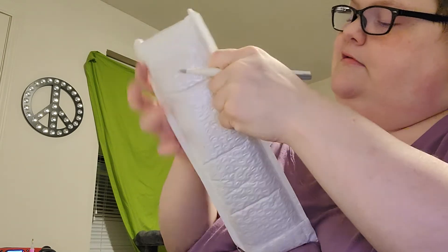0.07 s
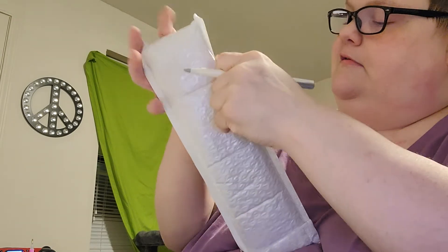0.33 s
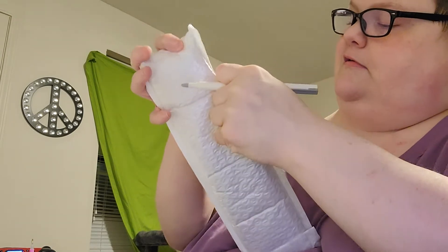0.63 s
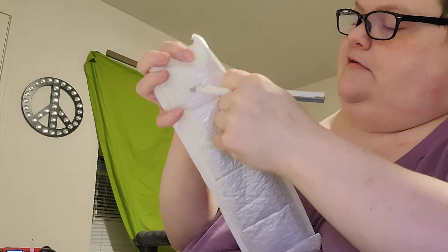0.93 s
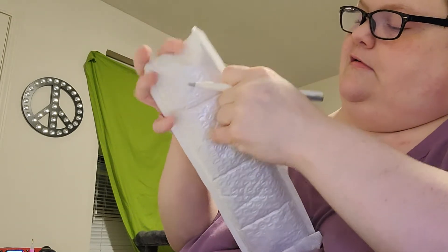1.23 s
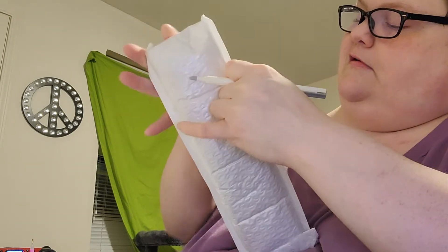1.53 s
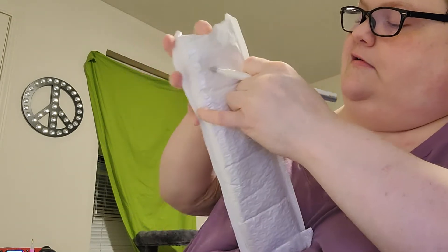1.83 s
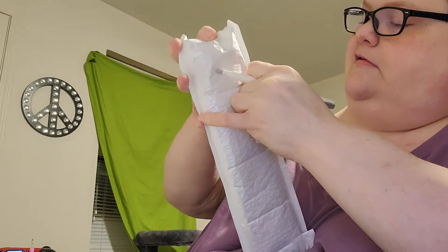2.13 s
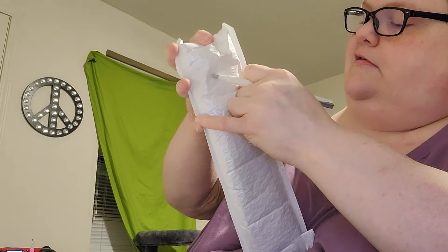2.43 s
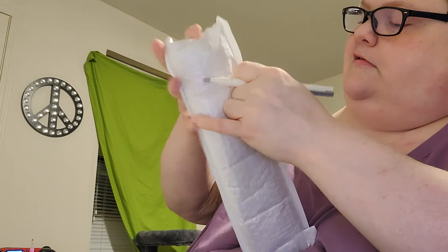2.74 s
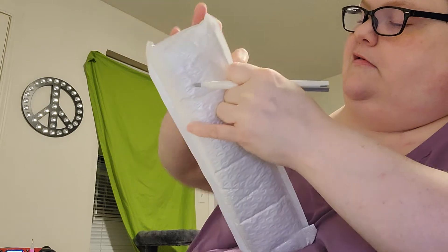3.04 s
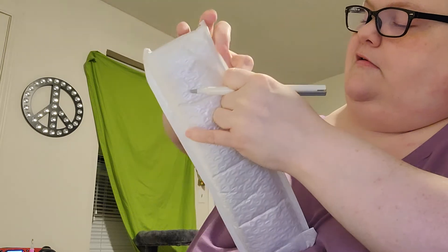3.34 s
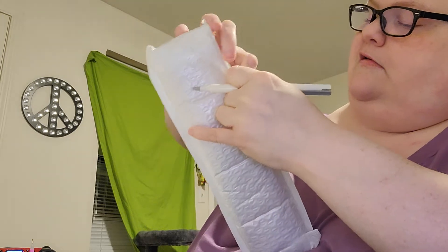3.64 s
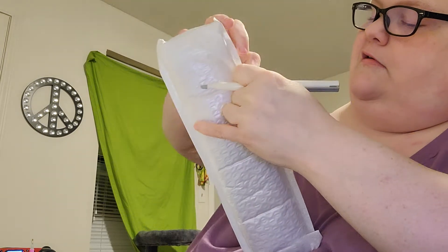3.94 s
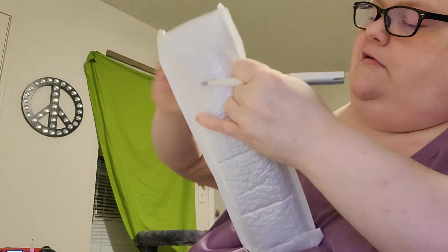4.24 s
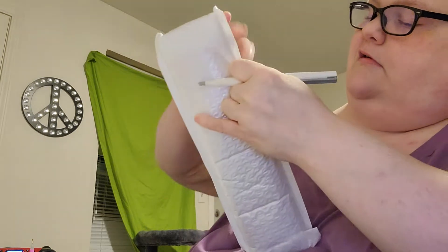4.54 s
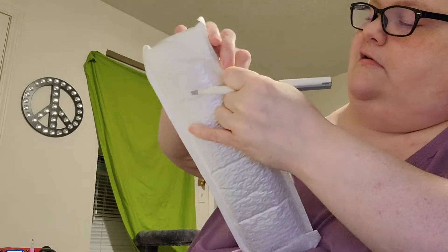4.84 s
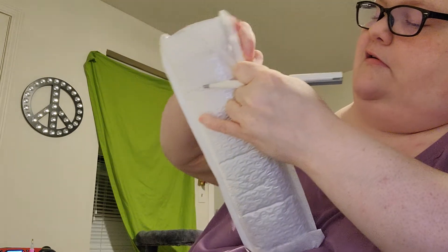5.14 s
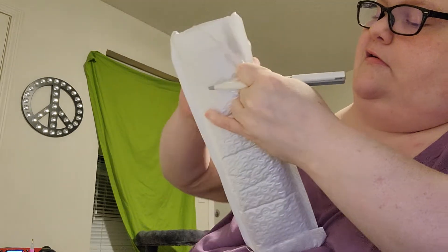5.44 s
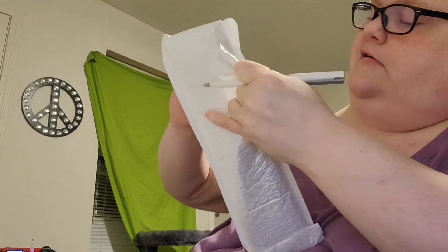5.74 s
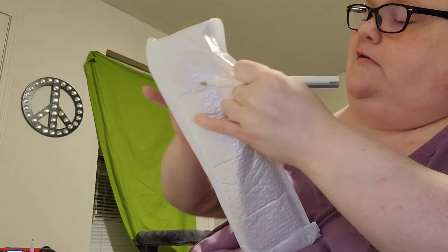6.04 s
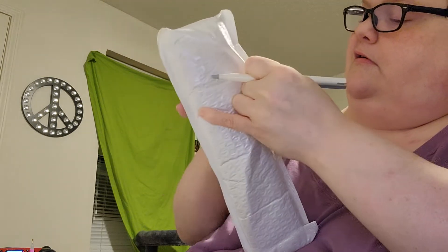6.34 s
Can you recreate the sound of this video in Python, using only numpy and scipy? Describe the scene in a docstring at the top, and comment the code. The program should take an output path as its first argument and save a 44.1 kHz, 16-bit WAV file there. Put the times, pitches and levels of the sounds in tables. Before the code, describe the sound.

A padded plastic mailer crinkles, snaps and swishes as fingers squeeze it and a pen tip pokes it, close up indoors.

```python
"""Creases snap in a padded plastic mailer, squeezed and poked with a pen tip, close up in a small room.
Each snap buckles a panel, cracks the film and thumps the air-filled pouch; a hard push ends in a burst
of crackle. Finger strokes flip wrinkles, crumple the padding, swish over the film and at times make
the pouch groan. The room answers briefly and rumbles faintly underneath."""
import sys
import numpy as np
from scipy import signal
from scipy.fft import rfft, irfft, next_fast_len
from scipy.io import wavfile
from scipy.ndimage import uniform_filter1d, map_coordinates

SR = 44100
rng = np.random.default_rng(int(sys.argv[2]) if len(sys.argv) > 2 else 0)


def wav_record(signal):
    """Record a signal, one row per channel, as 16-bit PCM in the file named by sys.argv[1]."""
    frames = np.transpose(np.atleast_2d(signal))
    bounded = np.clip(frames, -1, 1)
    # unit amplitude maps onto the largest positive 16-bit level
    quanta = np.round(bounded * 32767).astype(np.int16)
    wavfile.write(sys.argv[1], SR, quanta)


N = 285856

# Crease snaps: (time [s], panel level [dB], panel pitch [Hz], thump level [dB], crack level [dB])
CREASE_SNAPS = [(0.498, -30.5, 1410, -80, -54.5), (0.573, -31.5, 1530, -62, -61),
                (0.616, -30.5, 2230, -61, -54), (0.781, -29, 2360, -63, -54), (0.83, -33, 2000, -80, -55),
                (0.875, -39, 2260, -62, -55), (0.89, -38, 1390, -64, -55), (1.047, -36, 2040, -59, -59),
                (1.089, -29.5, 3550, -57.5, -60), (1.338, -26.5, 2260, -55, -62),
                (1.38, -37.5, 1280, -47.5, -69), (1.512, -31.5, 2300, -59.5, -53.5),
                (1.651, -35, 5800, -58, -49.5), (1.751, -30, 2410, -62, -59.5),
                (1.85, -30.5, 3920, -58.5, -70), (1.884, -42, 1190, -56.5, -50),
                (2.046, -27, 5100, -62, -50.5), (2.095, -31, 2160, -70, -58),
                (2.228, -26.5, 4530, -78, -54), (2.57, -50, 1300, -64.5, -56.5),
                (2.66, -31, 2600, -59, -55), (2.841, -30.5, 5170, -71, -48.5),
                (2.943, -33, 2330, -63, -48.5), (3.137, -33, 2220, -59, -60), (3.156, -33, 1490, -50, -61),
                (3.429, -51, 1400, -70, -56), (3.868, -26.5, 7250, -75, -59),
                (4.111, -46.5, 1310, -66, -66.5), (4.2643, -22.5, 1310, -46.5, -35.5),
                (4.267, -23, 2270, -42.5, -48.5), (5.295, -17.5, 1250, -42, -42.5),
                (5.304, -42, 950, -60, -49), (5.5705, -21.5, 1750, -52.5, -41.5),
                (5.593, -27, 2220, -60, -45), (5.6, -24, 1360, -66, -44), (5.621, -25, 2350, -43, -47),
                (5.6652, -2.5, 2520, -46, -35), (5.678, -23.5, 2750, -46, -47), (5.69, -17, 1370, -57, -60),
                (5.6985, -17.5, 2160, -48.5, -64), (6.229, -30, 1500, -57, -56),
                (6.28, -20.5, 2930, -63, -56.5)]
# Pouch thump spectrum: (frequency [Hz], gain [dB])
THUMP_SPECTRUM = [(60, -3), (150, -22), (220, 1.5), (290, -8), (370, 3), (520, 2), (700, 0), (1200, -8.5),
                  (2000, -3.5), (5000, -82)]
# Film crack spectrum: (frequency [Hz], gain [dB])
CRACK_SPECTRUM = [(500, -7), (2000, 13), (7200, 11), (9800, -3), (13500, -6), (16000, -6)]

def snaps(panel_gain_db=-3.5, thump_gain_db=-8, crack_gain_db=-6, creak_t60_s=0.0115, load_s=0.0016):
    """Each crease creaks under load, buckles, cracks, shivers, sets off folds and thumps the pouch."""
    out, t = np.zeros((2, N)), np.arange(-800, 3296) / SR
    for time_s, panel_db, hz, thump_db, crack_db in CREASE_SNAPS:
        cycles = 0.55 * (hz / 2500) ** 0.44  # taut, high panels ring for more cycles
        panel = amp(panel_db + panel_gain_db) * buckle(t, hz, cycles)
        settling = amp(0.62 * panel_db) * (amp(-21) * flutter(t, hz) + amp(-26) * aftershocks(t, hz))
        thump_envelope = swell(t, creak_t60_s, fall_t60_s=0.033)
        crack_envelope = swell(t - 0.00015, creak_t60_s, fall_t60_s=0.011)
        thump = amp(thump_db + thump_gain_db) * burst(THUMP_SPECTRUM, thump_envelope)
        crack = amp(crack_db + crack_gain_db) * burst(CRACK_SPECTRUM, crack_envelope)
        add(out, time_s + load_s + t[0], panel + settling + thump + crack)
    return out

def buckle(t, hz, cycles):
    """A panel flips over: a smooth packet of a few cycles, peak 1."""
    turns = np.maximum(t, 0) * hz
    wave = np.sin(2 * np.pi * turns) * turns ** 2 * np.exp(-turns / cycles)
    return wave / np.abs(wave).max()

def flutter(t, hz, cycles=0.56, t60_s=0.034):
    """The creased panel shivers raggedly at its own pitch; peak 1."""
    shiver = spread(rng.standard_normal((2, len(t))) ** 3) * (t >= 0) * amp(-60 * np.abs(t) / t60_s)
    ring = signal.fftconvolve(shiver, buckle(t[t >= 0], hz, cycles)[None], axes=1)[:, :len(t)]
    return ring / np.abs(ring).max()

def aftershocks(t, hz, pull_hz=2700, lag_s=0.008, t60_s=0.079, count=9):
    """Smaller folds give way just before and after a snap, each with its own pitch and side."""
    out = np.zeros((2, len(t)))
    waits_s = rng.exponential(lag_s, count) - lag_s / 2
    for wait_s, (pitch, pan) in zip(waits_s, scatter((count, 2))):
        fold_hz = np.sqrt(hz * pull_hz) * np.exp(0.35 * pitch)
        gain_db = -60 * abs(wait_s) / t60_s + 2 * pan * np.array([[1], [-1]])
        out += amp(gain_db) * buckle(t - wait_s, fold_hz, cycles=0.27)
    return out

# Dry wrinkle ticks: (time [s], level [dB], pitch [Hz])
WRINKLE_TICKS = [(0.03, -35, 2340), (0.197, -35, 4770), (0.464, -31.5, 4250), (0.481, -35, 2280),
                 (0.691, -40, 4770), (0.884, -30.5, 6850), (0.931, -39.5, 2280), (1.003, -49, 1350),
                 (1.154, -36.5, 2730), (1.204, -35, 3270), (1.259, -35, 8450), (1.308, -35, 3200),
                 (1.607, -39, 6200), (2.112, -32.5, 2130), (2.413, -45.5, 1590), (2.518, -39.5, 2390),
                 (2.534, -45, 2280), (2.634, -43.5, 2270), (2.803, -40, 2580), (2.891, -34, 2580),
                 (3.158, -33.5, 4530), (3.195, -43, 1410), (3.208, -34, 5650), (3.396, -45, 2190),
                 (3.454, -47, 2280), (3.497, -46, 4470), (3.539, -42, 2200), (3.575, -36.5, 1770),
                 (3.654, -42, 4400), (3.777, -36.5, 3900), (3.904, -39, 4240), (4.054, -42, 2070),
                 (4.07, -43, 7150), (4.964, -37, 2120), (4.99, -38.5, 2140), (5.062, -39, 3750),
                 (5.163, -42.5, 1500), (5.359, -35, 1880), (5.521, -45.5, 1300), (5.612, -24.5, 2240),
                 (5.911, -37, 2900), (5.972, -36, 4130), (6.099, -33, 8700), (6.262, -35, 2150),
                 (6.294, -32.5, 3200), (6.324, -34, 2600), (6.383, -32, 1993)]

def crinkles(gain_db=-3, faint_hz=3300, crack_t60_s=0.026, count=280):
    """Wrinkles flip, shiver and crack; faint random ones come denser and louder as the padding crumples."""
    crumple, _ = effort()
    strain = (crumple / np.median(crumple)) ** 0.38
    starts = np.searchsorted(np.cumsum(strain) / strain.sum(), rng.random(count))
    size, pitch = scatter((count, 2)).T
    faint_db = -48.5 + 20 * np.log10(strain[starts]) + 3.4 * size
    faint = zip(starts / SR, faint_db, faint_hz * np.exp(0.44 * pitch))
    flips, crack_envelope, t = np.zeros((2, N)), np.zeros(N), np.arange(1024) / SR
    for time_s, db, hz in [*WRINKLE_TICKS, *faint]:
        add(flips, time_s, amp(db) * (buckle(t, hz, cycles=0.55) + amp(-6) * flutter(t, hz)))
        add(crack_envelope, time_s, amp(db - 60 * t / crack_t60_s))
    cracks = amp(-12) * crack_envelope * burst(CRACK_SPECTRUM, np.ones(N))
    return amp(gain_db) * (flips + cracks)

# Finger and pen strokes: (start [s], length [s], crumpling level [dB], sliding level [dB])
HAND_STROKES = [(0.0, .035, -59, -56.5), (0.058, .36, -75, -58), (0.428, .07, -67.5, -55.5),
                (0.618, .04, -58.5, -57.5), (0.783, .16, -62, -55.5), (1.037, .17, -65, -66.5),
                (1.31, .12, -60, -52.5), (1.75, .13, -59, -57.5), (1.922, .08, -65, -61),
                (2.235, .02, -65.5, -54), (2.884, .033, -56.5, -54), (2.926, .045, -56.5, -55),
                (3.166, .06, -62, -59), (3.262, 0.012, -72, -55.5), (3.44, .16, -70, -63),
                (3.63, .022, -64, -52.5), (3.863, 0.024, -79.5, -55.5), (4.222, .035, -67.5, -58),
                (4.276, .03, -54.5, -48), (4.341, .027, -50, -44), (4.416, .06, -72, -55.5),
                (4.689, .025, -64, -54), (4.774, .02, -61, -59.5), (4.996, 0.028, -65.5, -55.5),
                (5.168, .11, -65.5, -61), (5.319, .085, -62, -53.5), (5.594, .113, -53, -44),
                (5.984, .115, -60, -55.5), (6.235, .088, -60.5, -60)]
# Light rubbing of the holding hand: (time [s], level [dB])
GRIP_RUB = [(0.3, -67), (1.0, -62), (1.9, -66), (2.45, -76), (3.3, -70), (4.0, -75.5), (4.6, -69),
            (5.8, -73), (6.48, -61)]

def effort(attack_s=0.027, release_t60_s=0.17, creep_db=-14, creep_t60_s=0.92):
    """(Crumpling, sliding) gains: strokes build, hold and let go, then the film creeps back."""
    t = np.arange(N) / SR
    power = amp(curve(GRIP_RUB) + np.array([[-1.5], [0.5]])) ** 2
    for start_s, length_s, crumple_db, slide_db in HAND_STROKES:
        attack = np.clip(1 + (t - start_s) / attack_s, 0, 1) ** 2
        after_s = np.maximum(t - start_s - length_s, 0)
        release = amp(np.maximum(-60 * after_s / release_t60_s, creep_db - 60 * after_s / creep_t60_s))
        power += (amp([[crumple_db], [slide_db]]) * attack * release) ** 2
    return np.sqrt(power)

# Padded sheet resonances: (centre [Hz], width [Hz], gain [dB])
SHEET_MODES = [(354.4, 30, -2), (508, 83, -2.5), (1405, 280, -3), (2090, 640, -1.5)]

def crumpling(folds_per_s=1000, clump_db=3):
    """Tiny folds give way in clumps and ring the padded sheet, whose tone shifts as it bends."""
    crumple, _ = effort()
    ring = np.zeros((2, N))
    for centre_hz, width_hz, db in SHEET_MODES:
        folds = ticks(folds_per_s, scatter_db=3) * amp(clump_db * wobble(39))
        ring += amp(db) * filtered(folds, lambda hz: resonance(hz, centre_hz, width_hz) ** 2)
    return crumple * unit(patchy(spread(flexed(ring)), depth_db=3.5))

def flexed(x, bend=0.09):
    """The sheet flexes: its resonances drift up and down in pitch."""
    position = np.cumsum(np.exp(bend * wobble(10)))
    return np.array([map_coordinates(side, [position], mode="mirror") for side in x])

# Film swish spectrum: (frequency [Hz], gain [dB])
SWISH_SPECTRUM = [(200, -19), (450, 0.5), (900, -8), (2300, -2.5), (3400, 0.5), (4700, -0.5), (7600, -2.5),
                  (9400, -18)]
# Top treble of the swish: (time [s], gain [dB])
SWISH_SHEEN = [(0, 4.5), (0.9, 0), (1.45, 5), (2.3, -3.5), (2.95, 4.5), (3.3, -1.5), (4.7, 4.5), (6.48, 5)]

def sliding(gain_db=0.94, slips_per_s=7000, sheen_hz=8800):
    """Skin and pen tip slip on the film: a fine swish that catches more where the padding crumples."""
    crumple, slide = effort()
    catch_db = 5.2 * crumple / (crumple + slide)
    slips = ticks(slips_per_s, scatter_db=3.5) * amp(wobble(50) + catch_db * wobble(220))
    swish = filtered(spread(slips), lambda hz: colour(SWISH_SPECTRUM, hz))
    swish = unit(patchy(swish, depth_db=2.7))
    top = filtered(swish, lambda hz: hz > sheen_hz)
    return amp(gain_db) * slide * (swish - top + amp(curve(SWISH_SHEEN)) * top)

# Pouch groans: (time [s], level [dB], pitch [Hz])
POUCH_GROANS = [(0.358, -52, 515), (1.105, -51.5, 552), (2.925, -49, 383), (5.625, -47.5, 345)]

def groans(rise_t60_s=0.033, fall_t60_s=0.054, waver_rad=0.18):
    """A dragging fingertip sticks and slips; the hollow pouch sounds one rough note."""
    out, t = np.zeros(N), np.arange(N) / SR
    for time_s, db, hz in POUCH_GROANS:
        note = unit(np.sin(2 * np.pi * hz * t + waver_rad * wobble(150)))
        out += amp(db) * swell(t - time_s, rise_t60_s, fall_t60_s) * note
    return out

# Broad spectral dips: (centre [Hz], width [Hz], depth [0-1])
TONE_DIPS = [(1727, 475, 0.56), (3090, 1360, 0.46)]

def notched(hz):
    """Two broad dips carve the tone of everything the mailer makes."""
    dips = [1 - depth * resonance(hz, centre_hz, width_hz) for centre_hz, width_hz, depth in TONE_DIPS]
    return np.prod(dips, axis=0)

# Stereo tilt: (frequency [Hz], left boost and right cut [dB])
LEFT_TILT = [(2400, -0.57), (5500, 1.4)]

def lean(hz, lead_s=0.00004):
    """The mailer sits slightly left and beams its treble that way."""
    sides = np.array([[1], [-1]])
    return amp(along(LEFT_TILT, hz) * sides) * np.exp(1j * np.pi * hz * lead_s * sides)

def grip_bump(time_s=3.157, level_db=-44, hz=56, t60_s=0.35):
    """The hand shifts its grip with a deep, soft thud."""
    out, t = np.zeros(N), np.arange(SR // 2) / SR
    add(out, time_s, amp(level_db - 60 * t / t60_s) * np.sin(2 * np.pi * hz * t))
    return out

# Room decay: (frequency [Hz], t60 [s])
ROOM_DECAY = [(300, 0.38), (1100, 0.15), (4500, 0.3), (14000, 0.073)]

def reflections(x, gap_s=0.004, blocks=12):
    """The walls answer; the pattern changes block by block as the mailer moves about."""
    out, edges = np.zeros((2, N)), np.linspace(0, N, blocks + 1).astype(int)
    for start, end in zip(edges, edges[1:]):
        hz, t, noise = signal.stft(spread(rng.standard_normal((2, SR // 2))), SR, nperseg=256)
        decay = amp(-60 * t / along(ROOM_DECAY, hz)[:, None])
        tail = signal.istft(noise * decay, SR, nperseg=256)[1]
        tail /= np.linalg.norm(tail[0])
        add(out, start / SR + gap_s, signal.fftconvolve(x[:, start:end], tail, axes=1))
    return out

# Room rumble spectrum: (frequency [Hz], gain [dB])
RUMBLE_SPECTRUM = [(25, -7), (40, -15.5), (55, 0.5), (80, -5.5), (115, -5.5), (160, -14.5), (1000, -21.5),
                   (2500, -42)]
# Room drone: (frequency [Hz], level [dB])
DRONE_TONES = [(55, -68.5), (65, -82), (92, -72.5)]

def room_tone(rumble_db=-64, hiss_db=-77):
    """Faint rumble, a wavering drone and a thin hiss."""
    def noise(spectrum):
        white = spread(rng.standard_normal((2, N)))
        return unit(filtered(white, lambda hz: amp(along(spectrum, hz))))
    t = np.arange(N) / SR
    drone = sum(amp(db) * unit(np.sin(2 * np.pi * hz * t + wobble(3.04))) for hz, db in DRONE_TONES)
    return amp(rumble_db) * noise(RUMBLE_SPECTRUM) + drone + amp(hiss_db) * noise(SWISH_SPECTRUM)

# Left-right likeness: (frequency [Hz], correlation [0-1])
COHERENCE = [(60, 0.9), (600, 0.79), (2000, 0.05)]

def spread(pair):
    """Two unrelated signals to left and right: alike in the bass, unrelated in the treble."""
    def weights(hz):
        angle = np.arccos(np.clip(along(COHERENCE, hz), -1, 1)) / 2
        return np.array([np.cos(angle), np.sin(angle)])
    mid, side = filtered(pair, weights)
    return np.array([mid + side, mid - side])

def ticks(per_s, scatter_db):
    """Random stereo impulses of uneven size."""
    size = amp(scatter_db * scatter(N))
    return (rng.random(N) < per_s / SR) * size * rng.standard_normal((2, N))

def burst(spectrum, envelope):
    """Stereo puff of coloured noise, rms 1."""
    noise = rng.standard_normal((2, len(envelope))) * envelope
    return unit(filtered(spread(noise), lambda hz: colour(spectrum, hz)))

def patchy(x, depth_db):
    """Shifting patches of gain, a few hundred Hz wide and tens of ms long."""
    frames = signal.stft(x, nperseg=512)[2]
    field = rng.standard_normal(frames.shape[1:])
    field = uniform_filter1d(uniform_filter1d(field, size=6, axis=0), size=6, axis=1)
    return signal.istft(frames * amp(depth_db * unit(field)), nperseg=512)[1][:, :N]

def swell(t, rise_t60_s, fall_t60_s):
    """Envelope that builds to t = 0, then dies."""
    return amp(-60 * np.maximum(-t / rise_t60_s, t / fall_t60_s))

def resonance(hz, centre_hz, width_hz):
    """Complex band-pass response."""
    return 1j * hz * width_hz / (centre_hz ** 2 - hz ** 2 + 1j * hz * width_hz)

def colour(spectrum, hz):
    """Causal response with the gain of the (Hz, dB) points."""
    cepstrum = irfft(np.log(amp(along(spectrum, hz))))
    cepstrum[1:len(hz) - 1] *= 2
    cepstrum[len(hz):] = 0
    return np.exp(rfft(cepstrum))

def filtered(x, response):
    """x through a complex frequency response."""
    length = x.shape[-1]
    padded = 2 * next_fast_len(length)
    return irfft(rfft(x, padded) * response(np.fft.rfftfreq(padded, 1 / SR)), padded)[..., :length]

def wobble(knots_per_s):
    """Smooth random curve."""
    knots = rng.standard_normal(int(N * knots_per_s / SR) + 4)
    return map_coordinates(knots, [np.arange(N) * knots_per_s / SR])

def scatter(shape):
    """Normal draws clipped at 2 sigma."""
    return np.clip(rng.standard_normal(shape), -2, 2)

def along(points, hz):
    """(Hz, value) points read on a log axis."""
    knots_hz, values = np.transpose(points)
    return np.interp(np.log(hz + 1), np.log(knots_hz + 1), values)

def curve(points):
    """(s, value) points as one value per sample."""
    return np.interp(np.arange(N) / SR, *np.transpose(points))

def add(track, time_s, sound):
    """Mix a sound into a track."""
    start = max(round(time_s * SR), 0)
    track[..., start:start + sound.shape[-1]] += sound[..., :max(N - start, 0)]

def amp(db):
    """Decibels to gain."""
    return 10 ** (np.asarray(db) / 20)

def unit(x):
    """x at rms 1."""
    return x / np.sqrt(np.mean(x ** 2) + 1e-20)

def scene(wet_db=-10):
    """The mailer in its room."""
    sources = snaps() + groans() + crinkles() + crumpling() + sliding()
    mailer = filtered(sources, lambda hz: notched(hz) * lean(hz))
    return mailer + amp(wet_db) * reflections(mailer) + grip_bump() + room_tone()

def record(dry, low_hz=36, top_hz=15950):
    """Low cut and steep band limit."""
    return filtered(dry, lambda hz: hz ** 4 / (hz ** 4 + low_hz ** 4) / (1 + (hz / top_hz) ** 160))

dry = scene()
out = record(dry)
wav_record(out)
```